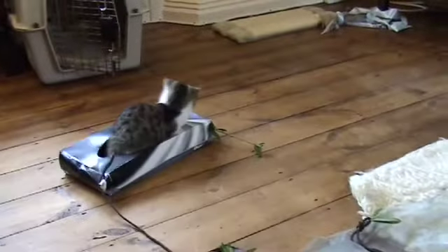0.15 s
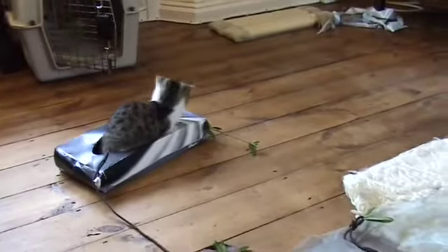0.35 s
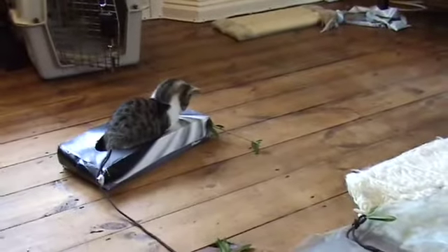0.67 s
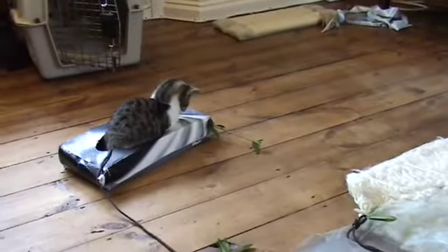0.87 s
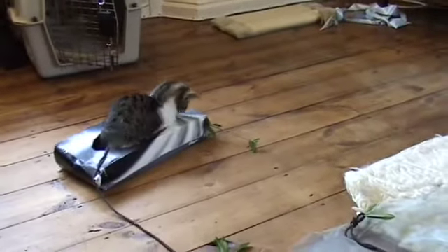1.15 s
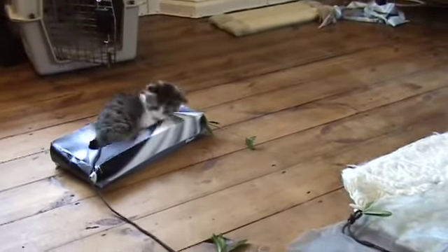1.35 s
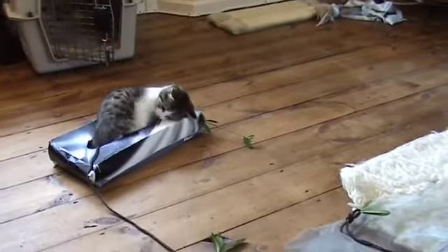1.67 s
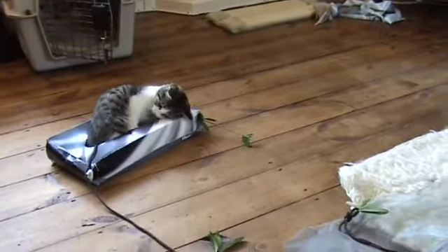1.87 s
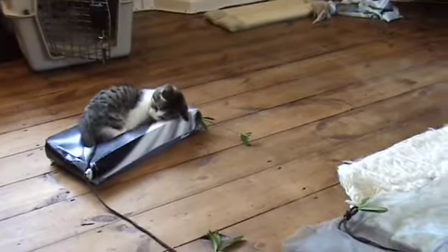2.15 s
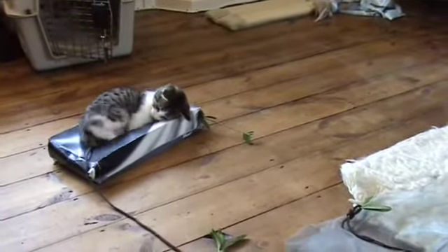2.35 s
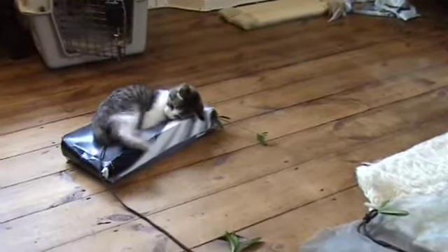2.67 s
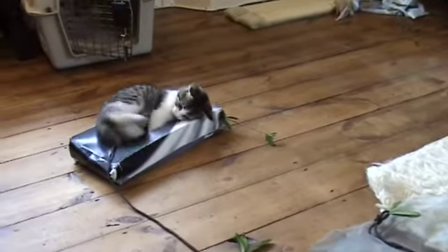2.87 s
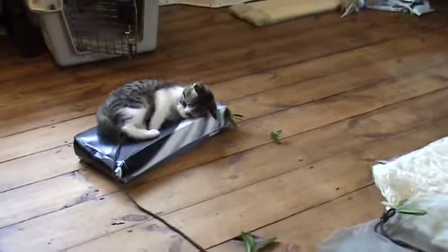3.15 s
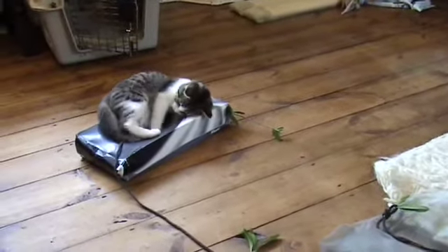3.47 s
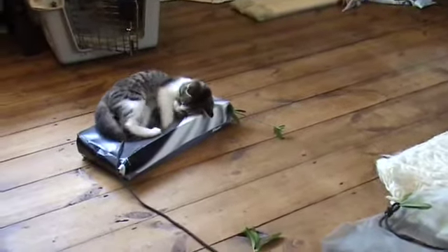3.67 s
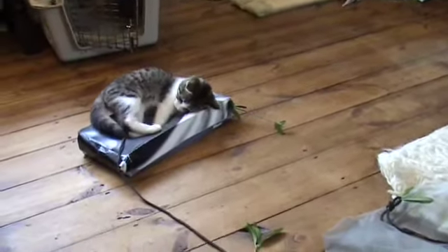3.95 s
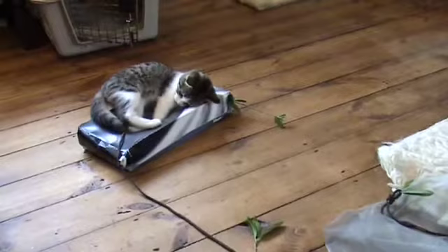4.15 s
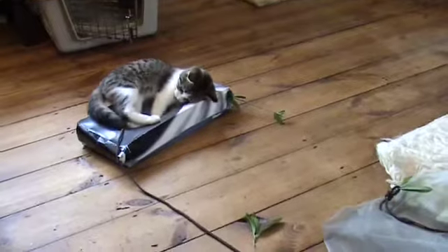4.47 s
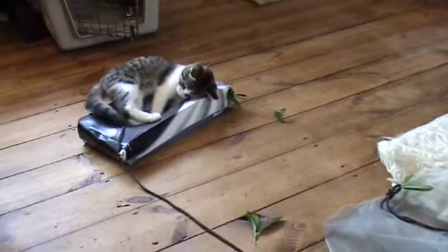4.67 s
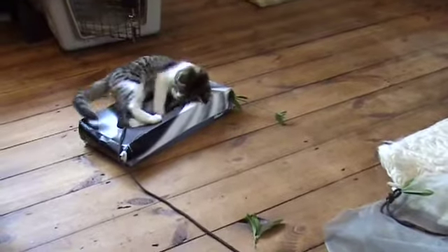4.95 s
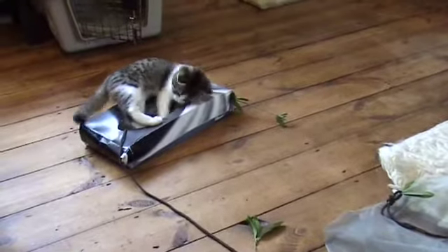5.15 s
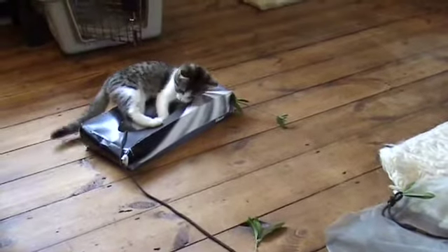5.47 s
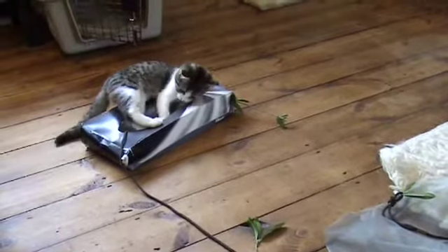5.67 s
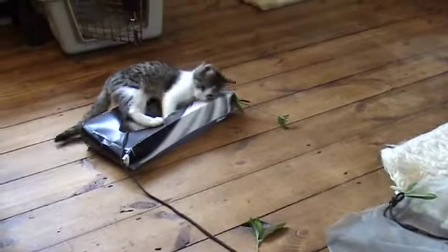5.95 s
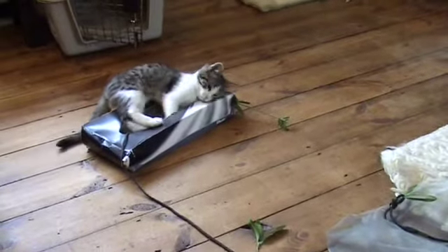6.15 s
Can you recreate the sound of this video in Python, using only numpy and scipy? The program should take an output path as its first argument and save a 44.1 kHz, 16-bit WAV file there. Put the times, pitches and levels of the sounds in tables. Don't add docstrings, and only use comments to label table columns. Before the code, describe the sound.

Irregular light knocks on a hollow wrapped box, paper crackling and claws scratching, in a lively wooden-floored room with faint hiss.

```python
import sys
import numpy as np
from scipy import signal
from scipy.fft import rfft, irfft
from scipy.io import wavfile
from scipy.ndimage import uniform_filter1d

SR = 44100
rng = np.random.default_rng(int(sys.argv[2]) if len(sys.argv) > 2 else 0)


def put_to_file(sound):
    columns = np.atleast_2d(sound).T
    safe = np.clip(columns, -1, 1)
    whole_steps = np.round(safe * 32767)
    wavfile.write(sys.argv[1], SR, whole_steps.astype(np.int16))


def level_to_linear(level):
    exponent = np.asarray(level, float) / 20
    return 10 ** exponent


N = 278712
HIT_LEN = 6000

# pitch in Hz, level in dB, t60 in seconds.
BOX_MODES = [(337, -5, 0.059), (364, -9, 0.16), (493.6, -0.5, 0.072), (570, 5.5, 0.036), (665, -1, 0.038),
             (787, -7, 0.047), (919, 4, 0.016), (1181, -10, 0.096)]


def evened(x):
    return x / np.sqrt(np.mean(x ** 2) + 1e-20)


def peaked(x):
    return x / abs(x).max()


def read(points, hz):
    f, value = np.transpose(points)
    return np.interp(np.log(hz + 1), np.log(f + 1), value)


def band(x, lo_hz, hi_hz, order=2):
    return signal.sosfilt(signal.butter(order, [lo_hz, hi_hz], "bandpass", fs=SR, output="sos"), x)


def ring(modes):
    t = np.arange(HIT_LEN) / SR
    return peaked(sum(level_to_linear(db - 60 * t / t60) * np.sin(2 * np.pi * hz * t) for hz, db, t60 in modes))


def paired(a, b, same):
    same = np.clip(same, -1, 1)[:, None]
    common = np.sqrt((1 + same) / 2) * a
    apart = np.sqrt((1 - same) / 2) * b
    return np.array([common + apart, common - apart])


def hiss():
    # frequency in Hz, density in dB per Hz.
    hiss_colour = [(12, -41.5), (20, -7), (119, -8), (225, -2), (289, -11), (382, -5), (415, -3.5),
                   (905, -11.5), (1260, -10), (2400, -18.5), (4540, -23), (5220, -24), (15400, -35)]
    # frequency in Hz, left-right likeness -1 to 1.
    hiss_likeness = [(60, -0.14), (180, -0.93), (550, -0.57), (1650, -0.62), (4970, -0.25), (15000, -0.058)]
    hz = np.fft.rfftfreq(1024, 1 / SR)
    a, b, c, d, patches = rng.standard_normal((N // 256 + 5, 513, 5)).T
    patches = evened(uniform_filter1d(uniform_filter1d(patches, 12, 0), 14, 1))
    z = paired(a + 1j * b, c + 1j * d, read(hiss_likeness, hz))
    z = z * level_to_linear(read(hiss_colour, hz)[:, None] + 0.35 * patches)
    return level_to_linear(-51.5) * evened(signal.istft(z, nperseg=1024, noverlap=768)[1][:, :N])


def grains(per_s, spread_db):
    size = level_to_linear(spread_db * np.minimum(rng.exponential(1, N), 4.2)) * rng.standard_normal(N)
    return size * (rng.random(N) < per_s / SR)


def patchy(x, patchy_db):
    z = signal.stft(x, nperseg=256)[2]
    patches = rng.standard_normal(z.shape[::-1])
    patches = evened(uniform_filter1d(uniform_filter1d(patches, 5, 0), 9, 1)).T
    return signal.istft(z * level_to_linear(patchy_db * patches), nperseg=256)[1][:N]


def strokes(rows):
    stroke_db = 20
    t, power = np.arange(0, N + 63, 64) / SR, 0
    for s, swell_ms, die_ms, db in rows:
        away = 1000 * np.maximum((s - t) / swell_ms, (t - s) / die_ms)
        power = power + level_to_linear(2 * (db - stroke_db * away))
    return np.interp(np.arange(N) / SR, t, power)


def rustle():
    # frequency in Hz, density in dB per Hz.
    crinkle_colour = [(2400, 6.5), (3600, 4.5), (4700, 6.5), (5800, 4), (7000, 5), (8500, 0), (12000, -16),
                      (15400, -33.5)]
    # peak time in seconds, swell in ms, die-away in ms, peak level in dB.
    crumples = [(0.664, 190, 240, -57), (1.15, 38, 107, -52), (1.178, 13, 96, -33), (1.228, 51, 18, -24),
                (1.268, 20, 31, -31.5), (1.365, 27, 52, -43), (6.184, 12, 26, -38), (3.418, 14, 47, -42.5),
                (4.03, 36, 30, -48), (1.63, 125, 54, -38), (1.79, 610, 70, -44.5), (1.88, 30, 240, -42),
                (1.95, 100, 800, -59), (2.26, 230, 44, -38), (2.716, 97, 150, -49), (2.9, 140, 350, -54),
                (3.316, 80, 2000, -51.5), (3.506, 430, 68, -67), (3.69, 12, 26, -53.5), (3.85, 60, 53, -48),
                (4.666, 130, 83, -44), (4.95, 360, 204, -54.5), (5.004, 64, 110, -45),
                (5.205, 14.2, 68, -40.5), (5.272, 80, 24, -48), (5.634, 50, 43, -58), (5.79, 30, 71, -40),
                (6.028, 190, 60, -41.5), (6.216, 64, 124, -32)]
    flaps = [(0.0, 10, 64, -19.5), (0.124, 210, 103, -35), (0.45, 40, 190, -56), (1.252, 15, 153, -22.5),
             (1.45, 79, 91, -40), (2.112, 24.6, 250, -40.5), (2.3, 73, 154, -44), (2.985, 57, 86, -41.5),
             (3.526, 12, 51, -42), (4.032, 26, 23, -35.5), (4.304, 26, 95, -48.5), (4.375, 13, 92, -31),
             (5.244, 16, 123, -33.5), (5.835, 15, 31, -21.5), (5.86, 34, 46, -23.5), (5.95, 20, 150, -43),
             (6.041, 7.7, 146, -32)]
    scrapes = [(0.0, 10, 35, -10), (0.124, 190, 200, -27), (0.28, 140, 41, -32), (0.803, 10, 57, -40),
               (1.156, 100, 200, -48), (1.239, 5.9, 12, -9.5), (1.26, 18, 260, -21), (1.45, 77, 140, -35),
               (1.629, 93, 99, -37.5), (1.74, 300, 270, -47.5), (1.942, 40, 115, -25),
               (2.112, 11, 280, -30.5), (2.282, 16, 124, -27), (2.716, 17, 79, -41.5),
               (2.986, 84, 78, -34.5), (3.44, 270, 22, -44.5), (3.87, 55, 500, -45), (4.0, 190, 250, -49.5),
               (4.304, 120, 170, -47.5), (4.372, 16, 190, -36), (4.93, 85, 92, -57), (4.666, 230, 48, -41),
               (4.974, 410, 89, -50), (5.2, 10, 95, -26), (5.634, 59, 14, -46.5), (5.795, 58, 200, -38),
               (5.846, 18, 103, -25.5), (5.95, 20, 68, -49), (6.04, 8, 340, -39.5), (6.216, 26, 480, -37)]
    shoves = [(0.0, 10, 67, -12.5), (0.451, 150, 440, -44.5), (0.664, 370, 280, -49), (1.22, 50, 22, -23.5),
              (1.43, 52, 80, -39.5), (3.74, 27, 137, -34), (4.24, 20, 60, -45), (1.85, 320, 820, -44),
              (2.112, 11, 140, -32), (2.716, 43, 116, -41.5), (3.527, 17, 67, -26), (3.691, 11, 26, -47),
              (5.04, 26, 12, -51.5), (5.828, 24.4, 22, -58)]
    # crinkle, box scrape, slap, floor rumble, fine fizz, all in dB.
    stroke_mix = [
        (-2.5, -29, -5.5, -38, -17),
        (-8.5, -32.5, -2.5, -38.5, -41),
        (-43, -2, -25, -14, -61),
        (-42.5, -9.5, -38, -1, -57.5),
    ]

    power = [strokes(rows) for rows in (crumples, flaps, scrapes, shoves)]
    loudness = np.sqrt(level_to_linear(stroke_mix).T ** 2 @ power)
    slips = patchy(grains(per_s=3500, spread_db=3.6), patchy_db=3.5)
    pushes = grains(per_s=1400, spread_db=3.5)

    crinkle = irfft(rfft(slips) * level_to_linear(read(crinkle_colour, np.fft.rfftfreq(N, 1 / SR))), N)
    damped_box = ring([(hz, db, 0.63 * t60) for hz, db, t60 in BOX_MODES])
    scrape = band(signal.oaconvolve(pushes, damped_box)[:N], 317, 1630)
    slap = band(band(np.roll(slips, SR), 780, 3380), 440, 2500, order=1)
    rumble = band(pushes, 103, 383)
    fizz = band(np.roll(slips, -SR), 7500, 11600)

    layers = [evened(x) for x in (crinkle, scrape, slap, rumble, fizz)]
    trims = level_to_linear([[-5], [-7], [-5], [-6], [-5]])
    return (trims * uniform_filter1d(loudness, 400) * layers).sum(0)


def knock(box_db, box_hz, thud_db, slap_db, crack_db):
    # pitch in Hz, level in dB, t60 in seconds.
    board_modes = [(98.5, -5.5, 0.063), (118, -6.5, 0.042), (155, 9, 0.079), (227.5, -1, 0.25)]
    t, chance = np.arange(HIT_LEN) / SR, rng.standard_normal((4, HIT_LEN))

    spot = ring([(box_hz, 0, .012), (1.48 * box_hz, -2, .009),
                 (1250, -3, .011), (1750, -7, .009), (2350, -11, .007)])
    near = []
    for (hz, db, t60), detune, uneven in zip(BOX_MODES, chance[2], chance[3]):
        far_db = 10 * abs(np.log2(hz / box_hz))
        near.append((hz * (1 + 0.0083 * detune), db - far_db + 2 * uneven, t60))
    box = spot + level_to_linear(-4) * ring(near)
    box *= 1 - np.exp(-(t / 0.0004) ** 2)
    box = band(box, 0.43 * box_hz, 2700)

    snaps = level_to_linear(-23 - 60 * t / 0.044) * chance[:2]
    snaps[:, 0] = 1
    snaps = np.roll(snaps, 20, axis=1)
    slap = band(band(snaps[0], 700, 3630), 520, 7500, order=1)
    crack = band(band(snaps[1], 3350, 7960), 1000, 9000)
    paper = level_to_linear(slap_db + 9.5) * peaked(slap) + level_to_linear(crack_db + 13.5) * peaked(crack)

    thud = ring(board_modes) * (1 - np.exp(-t / 0.0046))
    return level_to_linear(box_db - 5.5) * peaked(box) + level_to_linear(thud_db - 5.0) * thud + paper


def snap(db, hz):
    t = np.arange(HIT_LEN) / SR
    chatter = level_to_linear(-8.5 - 60 * t / 0.0079) * rng.standard_normal(HIT_LEN)
    chatter[0] = 1
    return level_to_linear(db - 9) * peaked(band(chatter, hz / 1.6, hz * 1.6))


def rubs():
    # peak time in seconds, length in ms, peak level in dB, pitch in Hz.
    rub_events = [(1.187, 30, -40, 7060), (1.226, 14.5, -32, 4800), (1.228, 19, -36.5, 6800),
                  (1.268, 11, -33, 6600), (1.268, 22, -31, 2790), (1.372, 21, -43, 5200),
                  (1.367, 17, -42, 6760), (1.985, 13, -40, 3700), (1.965, 40, -40, 4860),
                  (1.9, 14, -51, 4350), (4.028, 26, -48, 2450), (4.03, 30, -48, 4900),
                  (4.035, 15, -52, 7300), (3.42, 30, -50, 5470), (0.117, 4.9, -34.5, 4900),
                  (0.03, 60, -27.5, 1350), (0.325, 17, -38.5, 1375), (5.795, 18, -46, 8900),
                  (5.857, 21, -38, 5170), (5.86, 11, -44, 6600), (6.056, 13, -39, 2840),
                  (6.187, 6.2, -42.5, 8160), (0.664, 79, -63, 7000), (0.668, 75, -66, 4750),
                  (3.79, 90, -37, 662)]
    fuzz = 1.14
    out = np.zeros(N + 8000)
    t = np.arange(-4000, 4000) / SR
    for s, ms, db, hz in rub_events:
        x = evened(band(rng.standard_normal(8000), hz / fuzz, hz * fuzz))
        out[round(s * SR):][:8000] += level_to_linear(db) * x * np.exp(-(2000 * t / ms) ** 2)
    return out[4000:N + 4000]


def paw(box_db, box_hz, floor_db, floor_hz):
    t, t60 = np.arange(HIT_LEN) / SR, 0.067
    box = ring([(box_hz, 0, t60), (1.295 * box_hz, -2, 0.5 * t60), (2.35 * box_hz, -3, 0.13 * t60)])
    box *= 1 - np.exp(-(t / 0.0006) ** 2)
    floor = ring([(floor_hz, 0, 1.73 * t60), (1.4 * floor_hz, -3, t60)])
    floor *= 1 - np.exp(-t / 0.003)
    return level_to_linear(box_db + 0.5) * box + level_to_linear(floor_db + 18.5) * floor


def room(x):
    # frequency in Hz, t60 in seconds.
    room_decay = [(120, 0.68), (330, 0.28), (870, 0.43), (2300, 0.37), (6000, 0.4), (12000, 0.32)]
    # frequency in Hz, left-right likeness 0 to 1.
    room_likeness = [(100, 0.95), (500, 0.98), (1500, 0.77), (4000, 0.75), (8500, 0.099), (11000, 0.71),
                     (13000, 0.87)]
    # frequency in Hz, level in dB.
    room_colour = [(100, -16.5), (500, -0.5), (2000, -2), (6000, -2), (12000, -3)]
    # delay in seconds, level in dB.
    early_echoes = [(.0019, -5.5), (.0045, -9.5), (0.0115, -9), (0.023, -16), (0.03, -22.5)]
    taps = np.zeros((2, SR))
    at = np.arange(200, SR - 20, 20) + rng.integers(0, 20, (2, (SR - 201) // 20))
    np.put_along_axis(taps, at, rng.choice([-1., 1.], at.shape), 1)

    hz, t, (a, b) = signal.stft(taps, SR, nperseg=256)
    fall_db = 60 * t / read(room_decay, hz)[:, None]
    shape = level_to_linear(read(room_colour, hz)[:, None] - fall_db) * (1 - np.exp(-t / 0.0073))
    tail = signal.istft(paired(a, b, read(room_likeness, hz)) * shape, SR, nperseg=256)[1]
    tail *= level_to_linear(-1.5) / np.linalg.norm(tail[0])

    tail[:, 0] += 1
    for s, db in early_echoes:
        arrival = round(s * SR * rng.uniform(.9, 1.1)) + rng.integers(0, 4, 2)
        tail[[0, 1], arrival] += level_to_linear(db) * rng.choice([-1, 1])
    return signal.fftconvolve(x[None], tail, axes=1)[:, :N]


def shifting(x):
    turn = 2 * np.pi * 3.1 * np.arange(N) / SR
    return sum(room(x * np.sqrt((1 + np.cos(turn + k * 2 * np.pi / 3)) / 3)) for k in range(3))


def whine():
    whistle = (3.1, 3.26, 10150)
    start, end, hz = whistle
    gate = 1. * (abs(np.arange(N) / SR - (start + end) / 2) < (end - start) / 2)
    tone = evened(band(rng.standard_normal(N), hz - 50, hz + 50))
    return level_to_linear(-79) * tone * uniform_filter1d(gate, 900)


def scene():
    # start in seconds, box peak in dB, box pitch in Hz, paper slap in dB, paper crack in dB.
    stomps = [(0.116, -20, 566, -29, -40), (0.799, -26.5, 470, -46, -73), (1.84, -6.5, 625, -25.5, -44),
              (1.933, -30, 1192, -14.5, -22), (2.697, -32, 740, -54, -45), (2.964, -19, 680, -48, -43.5),
              (2.984, -37, 417, -51, -40), (3.413, -34, 510, -37, -41), (4.236, -35.5, 490, -75, -73),
              (5.048, -10.5, 478, -26, -29), (5.157, -11.5, 700, -18.5, -30.5), (6.184, -43, 797, -52, -39)]
    swats = [(0.001, -5.5, 565, -24, -32), (0.019, -11.5, 584, -25, -33), (0.215, -26, 487, -41.5, -44),
             (0.289, -13.5, 680, -28, -47), (1.577, -24.5, 636, -51, -47), (2.103, -12.5, 536, -32.5, -56),
             (2.137, -21.5, 760, -32, -54), (2.277, -14.5, 440, -57, -33.5),
             (2.285, -17.5, 467, -29.5, -53), (2.872, -38, 500, -56, -55), (3.171, -41, 670, -53, -73.5),
             (4.999, -36.5, 775, -54, -47), (5.118, -7.5, 520, -29, -60), (5.192, -3.5, 515, -25, -55),
             (5.48, -35.5, 493, -49, -71), (5.595, -35, 530, -58, -84)]
    flicks = [(0.147, -18, 930, -39, -39), (0.344, -13, 665, -30.5, -45), (1.328, -7.5, 400, -23.5, -42),
              (1.434, -15.5, 800, -34.5, -43), (1.738, -22, 494, -45, -42), (3.701, 1, 615, -21.5, -26.5),
              (4.367, -22, 876, -44, -46.5), (4.548, -30, 504, -57, -57), (4.6, -21.5, 584, -46.5, -47),
              (4.652, -29.5, 520, -42, -55), (4.657, -27, 550, -45, -58), (4.4, -25, 840, -50, -56),
              (3.716, -10.5, 550, -46, -55), (3.693, -34, 600, -53, -55), (5.222, -14.5, 800, -49, -60),
              (5.82, -10, 560, -28.5, -35), (6.037, -21.5, 575, -32, -34.5), (6.207, -16, 514, -24, -38)]
    # start in seconds, box peak in dB, box pitch in Hz, floor peak in dB, floor pitch in Hz.
    paws = [(1.24, 2, 363, -28.5, 182.6), (1.258, -5, 370, -32.5, 150), (2.716, -32, 440, -50, 173),
            (2.975, -23.5, 328, -43, 153), (3.523, -21, 330, -39, 120), (5.049, -28, 345, -38.5, 127),
            (0.31, -20.5, 314, -48.5, 180), (5.816, -42, 320, -59.5, 150), (4.71, -37, 317, -61, 188),
            (5.6, -51, 286, -65, 130), (1.29, -11.5, 372, -55, 150), (3.702, -20, 300, -40, 165)]
    # start in seconds, peak level in dB, pitch in Hz.
    crease_snaps = [(1.1528, -34.5, 2380), (1.1703, -28.5, 3117), (1.173, -27.5, 4880),
                    (1.1846, -28, 7140), (1.2107, -13, 2150), (1.219, -32, 4770), (1.2297, -11, 2540),
                    (1.2571, -20, 2830), (1.261, -20, 2450), (1.309, -14.5, 1910), (1.3284, -23, 1820),
                    (1.3674, -17, 1508), (1.4354, -15, 1700), (1.4751, -35, 1500), (1.4893, -26, 1770),
                    (0.0195, -15.5, 1590), (0.053, -18.5, 1730), (0.1163, -15, 1510), (0.1334, -31, 2570),
                  (0.1494, -25, 1550), (0.288, -20.5, 2090), (0.3442, -22, 1760), (1.8402, -20, 2520),
                  (1.943, -12, 1900), (2.1036, -33, 2130), (2.9527, -33, 1744), (2.9754, -28, 1680),
                  (3.4144, -16.5, 2700), (3.716, -18, 1570), (3.9754, -43, 2500), (4.02, -38, 1740),
                  (4.021, -30.5, 2490), (4.2872, -45, 1870), (4.373, -30.5, 1660), (4.399, -29, 1650),
                  (4.5116, -43, 1720), (5.0497, -12.5, 2500), (5.1178, -30, 2720), (5.1654, -23, 1750),
                  (5.1906, -18, 1640), (5.2218, -28, 2220), (5.2593, -23, 2390), (5.7738, -35.5, 2500),
                  (5.7862, -30, 2160), (5.8327, -15, 2245), (5.8444, -18, 2190), (5.856, -20, 1750),
                  (5.883, -24, 1690), (6.0377, -23.5, 2740), (6.053, -18, 2740), (6.2073, -16, 1650)]

    knocks = []
    for rows, thud_db in ((stomps, -12), (swats, -17.5), (flicks, -39)):
        knocks += [(s, db, hz, db + thud_db, slap_db, crack_db) for s, db, hz, slap_db, crack_db in rows]

    spots = np.zeros((4, N + 6100))
    for rows, blow in ((sorted(knocks), knock), (paws, paw), (crease_snaps, snap)):
        for k, (s, *how) in enumerate(rows):
            spots[k % 4, round((s + .0012) * SR):][:HIT_LEN] += blow(*how)
    blows = sum(room(x[:N]) for x in spots) * level_to_linear([[-.2], [.2]])
    play = blows + shifting(rustle() + rubs())
    return band(play, 140, 21000, order=1) + hiss() + whine()


def band_limit(x):
    return signal.sosfilt(signal.butter(12, 15600, fs=SR, output="sos"), x)


def record(dry):
    soft = 2 * np.tanh(dry / 2)
    mid, side = soft.mean(0), (soft[0] - soft[1]) / 2
    side = 0.57 * side + 0.47 * signal.oaconvolve(side, signal.firwin(63, 11500, fs=SR), "same")
    top_cut = signal.firwin(255, 15700, fs=SR)[None]
    return band_limit(signal.oaconvolve([mid + side, mid - side], top_cut, "same"))


dry = scene()
out = record(dry)
put_to_file(out)
```